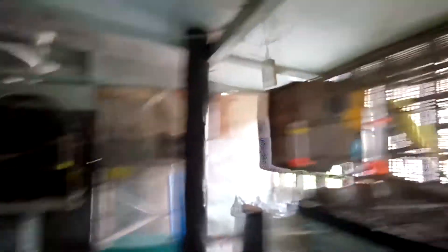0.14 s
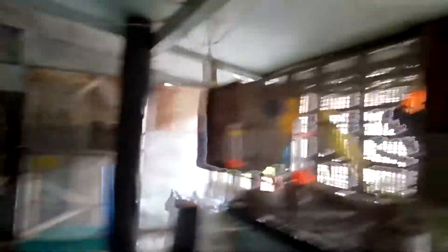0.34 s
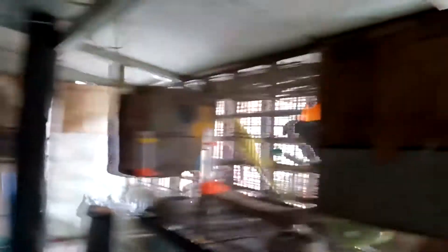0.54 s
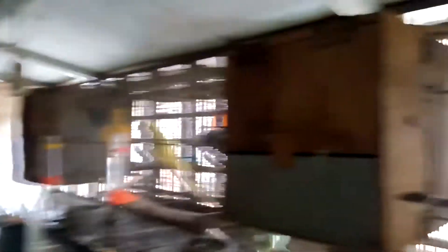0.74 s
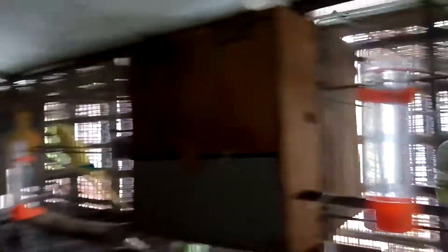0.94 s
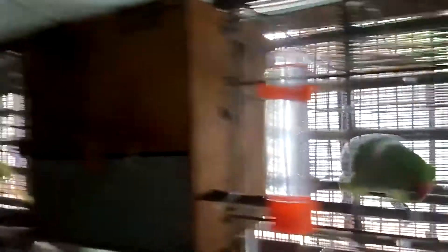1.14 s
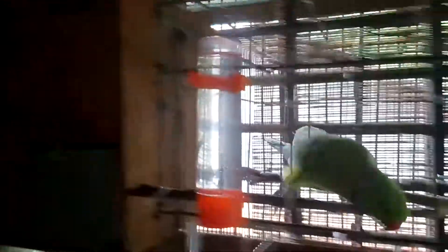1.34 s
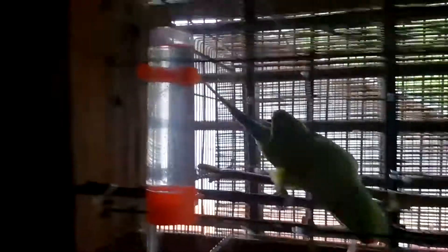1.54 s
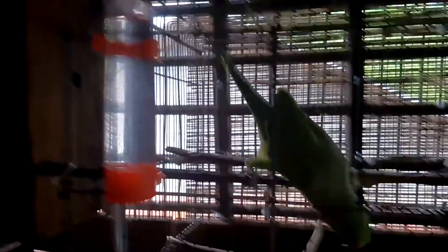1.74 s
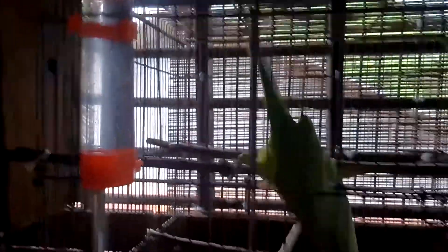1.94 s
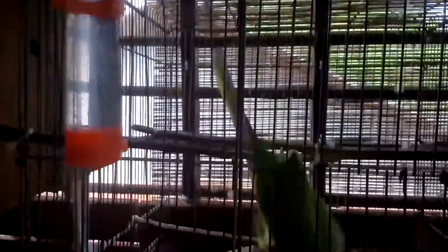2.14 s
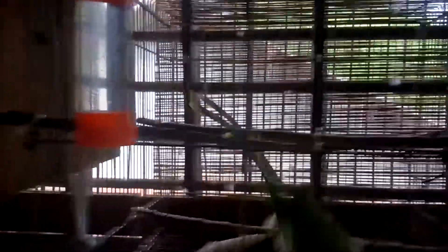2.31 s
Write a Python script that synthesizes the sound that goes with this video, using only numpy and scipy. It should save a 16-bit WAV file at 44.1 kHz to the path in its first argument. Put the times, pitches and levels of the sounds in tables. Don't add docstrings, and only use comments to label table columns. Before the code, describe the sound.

A parakeet squawks harshly twice, close and loud, breaking between whistle and rasp; another bird answers with a nasal note stepping up. Then quiet aviary air, far clucks, faint peeps and claw ticks, on a handheld stereo microphone.

```python
import sys
import numpy as np
from scipy import signal
from scipy.fft import rfft, irfft
from scipy.io import wavfile
from scipy.ndimage import uniform_filter1d

SR = 44100
rng = np.random.default_rng(int(sys.argv[2]) if len(sys.argv) > 2 else 0)


def wav_record(signal):
    frames = np.transpose(np.atleast_2d(signal))
    bounded = np.clip(frames, -1, 1)
    quanta = np.round(bounded * 32767).astype(np.int16)
    wavfile.write(sys.argv[1], SR, quanta)


def ratio_of_db(decibels):
    return 10 ** (np.asarray(decibels, float) / 20)


N = 104649


def unit_power(x):
    return x / np.sqrt(np.mean(np.abs(x) ** 2) + 1e-20)


def read_spectrum(points, hz):
    point_hz, point_db = np.transpose(points)
    return np.interp(np.log(hz), np.log(point_hz), point_db)


def slow_drift(rate_hz, size):
    r = np.exp(-2 * np.pi * rate_hz / SR)
    drift = signal.lfilter([1], [1, -2 * r, r * r], rng.standard_normal(size + 4000))
    return unit_power(drift[4000:])


def filtered(x, order, hz, kind="low"):
    return signal.sosfilt(signal.butter(order, hz, kind, fs=SR, output="sos"), x)


def coloured_noise(points, size):
    hz = np.maximum(np.fft.rfftfreq(size, 1 / SR), 1)
    below = (points[0][0] / 2, points[0][1] - 20)
    above = (SR / 2, points[-1][1] - 20)
    gain = ratio_of_db(read_spectrum([below] + list(points) + [above], hz))
    return unit_power(irfft(rfft(rng.standard_normal(size)) * gain, size))


def pan(left_db):
    return ratio_of_db(left_db * np.array([[.5], [-.5]]))


# pitch_hz, level_db
THROAT = [(900, -46), (1300, -12.5), (2100, -20.5), (3600, 0.5), (4800, -7.5), (6600, -5), (8500, -19),
          (11000, -24.5), (15000, -29.5)]


def note(rows, tones=None, half_db=0, breath_db=-40, follow=0, tear=1):
    wobble_hz, wobble_share = 59, 0.0043
    flutter_hz, flutter_db = 45, 2.5
    tear_share, blur_hz, edge_s = 0.077, 5400, 0.0053
    size = 16384
    s, *columns = np.transpose(rows)
    a, b = max(int(s[0] * SR), 0), min(int(s[-1] * SR), N)
    t = np.arange(a, b) / SR
    hz, db, rough = [np.interp(t, s, c) for c in columns]
    wobble = 1 + wobble_share * slow_drift(wobble_hz, size)[:b - a]
    phase = 2 * np.pi * np.cumsum(hz * wobble) / SR
    flutters = rows[1][3] > .04
    wave, power = 0, 0
    for k, tone_db in tones or [(k, None) for k in range(1, 17)]:
        if tone_db is None:
            heard_hz = k * hz * (hz[0] / hz) ** follow
            gain = ratio_of_db(read_spectrum(THROAT, heard_hz) + half_db * (k % 2))
        else:
            gain = ratio_of_db(tone_db)
        gain = gain * (k * hz < 15500)
        gain = gain * ratio_of_db(flutter_db * flutters * slow_drift(flutter_hz, size)[:b - a])
        clear = (1 - np.clip(rough, 0, 1)) ** (.5 + (k * hz / blur_hz) ** 2)
        noise = rng.standard_normal((2, size))
        torn = filtered(noise[0] + 1j * noise[1], 4, tear * tear_share * rows[1][1])
        body = np.sqrt(clear) + np.sqrt(1 - clear) * unit_power(torn)[a - b:]
        wave = wave + gain * np.imag(body * np.exp(1j * (k * phase + k * k)))
        power = power + uniform_filter1d(gain ** 2, size=800) / 2
    breath = filtered(coloured_noise(THROAT, size), 6, hz.min(), "high")
    wave = wave / np.sqrt(power) + ratio_of_db(breath_db) * breath[a - b:]
    edge = np.clip(np.minimum(t - s[0] + (a == 0), s[-1] - t) / edge_s, 0, 1)
    return np.pad(wave * ratio_of_db(db) * edge, (a, N - b))


# start_s, pitch_hz, level_db, roughness (0-1)
RASPS = [
    [(0.0, 1479, -20, 0.77), (.012, 1940, -30, 0), (.045, 2555, -43, 0.7)],
    [(.145, 3100, -36, 0.6), (.16, 2700, -29.5, 0.34), (.175, 2250, -21.5, 0.5), (.19, 2081, -22, 1),
     (.215, 1763, -20.5, 0.26), (.24, 1665, -34.5, .9), (.3, 1700, -37.5, 1.1)],
    [(.421, 653, -25, 0.3), (.445, 630, -20.5, .75), (.475, 638, -22.5, 0.87), (.497, 818, -25, 0.4),
     (.512, 870, -50, 1.1)],
    [(.503, 2350, -18.5, .6), (.515, 2542, -33, 0.6), (.53, 2570, -26.5, 0.8), (.56, 2460, -46, 0.4)],
]
RASP_BREATH = [4.2, 1.2, 1.1, 4.8]


def rasps():
    total = 0
    for rows, breath_db in zip(RASPS, RASP_BREATH):
        low = rows[0][1] < 900
        total = total + note(rows, half_db=-7 * low, breath_db=breath_db, follow=1. * low)
    return total


# pitch_hz, level_db (per Hz)
PUFF = [(250, -34), (900, -12), (2200, -23.5)]


def puff():
    start_s, level_db, decay_s = .421, -26, 0.014
    t = np.arange(N) / SR - start_s
    return ratio_of_db(level_db) * (t > 0) * np.exp(-np.abs(t) / decay_s) * coloured_noise(PUFF, N)


# multiple (of pitch), level_db
WHISTLE_TONES = [(1, -21), (2, -37.5), (3, -50.5)]
# start_s, pitch_hz, level_db, roughness (0-1)
HIGH_WHISTLE = [(0.028, 5100, -48, 0.4), (0.036, 5110, -13.5, 0), (0.052, 5180, -22, 0.3),
                (.07, 5230, -15.5, 0.16), (.082, 4940, -24.5, 0.34), (0.096, 4730, -24, 0.3),
                (0.112, 4630, -31, 0.4)]
# start_s, pitch_hz, level_db, roughness (0-1)
DROP = [(.066, 4860, -18, .6), (.08, 4500, -29, 0.7), (.092, 3866, -18.5, 0), (.104, 3800, -25, 0.2)]
# start_s, pitch_hz, level_db, roughness (0-1)
CROAK = [(.424, 891, -34, 1), (.445, 1245, -29, 0.7), (.46, 1340, -38, 0.4), (.482, 1420, -51, .6)]
# start_s, pitch_hz, level_db, roughness (0-1)
CLIMB = [(.44, 1750, -28, .9), (.465, 1850, -20, .8), (.49, 2000, -18, .85), (.505, 2250, -18, .9),
         (.52, 2580, -20, .7), (.535, 2600, -28, .7)]
# multiple (of pitch), level_db
CLIMB_TONES = [(1, -16), (2, 3.5), (3, -21), (4, -15)]
# start_s, pitch_hz, level_db, roughness (0-1)
GLIDE = [(.566, 2483, -22, .3), (.58, 2373, -20.5, 0.54), (.601, 2183, -13.5, 0), (.622, 1980, -17, 0.5),
         (.645, 1800, -11.5, 0), (.665, 1628, -18.5, 0.32), (.70, 1571, -32.5, 1)]
# multiple (of pitch), level_db
GLIDE_TONES = [(1, -20), (2, 0.5), (3, -8), (4, -15.5), (5, -21.5)]


def parakeet():
    wide_tear = 2.2
    voice = note(HIGH_WHISTLE, WHISTLE_TONES, breath_db=-23)
    voice += note(DROP, WHISTLE_TONES)
    voice += note(CROAK, [(0.97, 0)], tear=wide_tear)
    voice += note(CLIMB, CLIMB_TONES, breath_db=-15, tear=wide_tear)
    voice += note(GLIDE, GLIDE_TONES, breath_db=-15, tear=1.38)
    return voice + puff() + rasps()


# start_s, pitch_hz, level_db, roughness (0-1)
WHISTLES = [
    [(0.0, 3590, -15, .25), (.018, 3680, -10, .2), (.028, 3760, -11, .2), (.036, 3860, -20, .3),
     (.06, 3800, -25, .4), (.09, 3750, -32, .5)],
    [(.096, 3760, -22, .1), (.105, 3670, -12, .15), (.119, 3610, -16, .1), (.128, 3585, -7, .03),
     (.134, 3570, -8, .03), (.139, 3560, -18, .3), (.16, 3500, -15, .3), (.18, 3450, -26, .3)],
    [(.523, 3420, -28, .05), (.532, 3405, -17, .03), (.55, 3415, -9, .02), (.566, 3390, -10.5, .02),
     (.574, 3300, -20, .05)],
]


def whistles():
    lead = 3
    clear = sum(note(rows, WHISTLE_TONES, breath_db=-23) for rows in WHISTLES)
    return np.array([np.pad(clear[lead:], (0, lead)), clear]) * pan(-5)


# start_s, pitch_hz, level_db, roughness (0-1)
ANSWER_LOW = [(0.772, 1345, -38, 0.15), (.79, 1350, -30, .12), (0.812, 1356, -23, 0.08),
              (0.846, 1325, -23, 0.1), (0.866, 1385, -27, 0.2)]
# multiple (of pitch), level_db
LOW_TONES = [(1, -10), (2, -8.5), (3, -7.5), (4, -5.5), (5, -15.5), (6, -21), (7, -27), (8, -37)]
# start_s, pitch_hz, level_db, roughness (0-1)
ANSWER_HIGH = [(.852, 1343, -27.5, 0.091), (.876, 1433, -19.5, 0.054), (.9, 1433, -20, 0.12),
               (.93, 1416, -19.5, 0.09), (.948, 1413, -16.5, 0.39), (.964, 1360, -23, 0.19),
               (.98, 1331, -21, 1), (1.0, 1367, -45, 0.39)]
# multiple (of pitch), level_db
HIGH_TONES = [(1, -24.5), (2, -6.5), (3, -17.5), (4, -10.5), (5, -25.5), (6, -28.5), (7, -55), (8, -39.5),
              (10, -57)]
# start_s, pitch_hz, level_db, roughness (0-1)
ANSWER_START = [(.738, 1400, -48, .02), (.752, 1390, -39, .02), (.775, 1360, -40, .02),
                (.845, 1335, -39, .03), (.872, 1415, -40, .03), (.95, 1410, -39, .04),
                (.975, 1350, -48, .2)]


def neighbour():
    nasal = note(ANSWER_LOW, LOW_TONES, breath_db=-22) + note(ANSWER_HIGH, HIGH_TONES, breath_db=-22)
    return nasal, note(ANSWER_START, [(0.99, 0)])


# start_s, length_s, level_db, pitch_hz
CLUCKS = [
    (.726, .09, -44, 635),
    (.955, .13, -43, 618),
    (1.205, .12, -44, 615),
    (1.519, .07, -46, 590),
    (1.79, .14, -46, 628),
    (2.08, .05, -47, 585),
]
# multiple (of pitch), level_db
CLUCK_TONES = [(1, 0), (2, -4), (3, -12), (4, -26)]


def fowl():
    rise_s, sag_db, rough = .03, 3, .5
    total = 0
    for start_s, length_s, level_db, pitch_hz in CLUCKS:
        rows = [(start_s, .92 * pitch_hz, level_db - sag_db, rough),
                (start_s + rise_s, pitch_hz, level_db, rough),
                (start_s + length_s, 0.88 * pitch_hz, level_db - 2 * sag_db, rough)]
        total = total + note(rows, CLUCK_TONES)
    return total


# start_s, length_s, pitch_hz, level_db
PEEPS = [
    (1.229, 0.033, 4980, -53.5),
    (1.795, 0.015, 5210, -48.5),
    (2.168, 0.036, 4630, -56),
]


def peeps():
    total = 0
    for start_s, length_s, pitch_hz, level_db in PEEPS:
        rows = [(start_s, pitch_hz, level_db, .6), (start_s + length_s, .97 * pitch_hz, level_db, .6)]
        total = total + note(rows, [(0.99, 0)])
    return total


# start_s, level_db
TICKS = [
    (1.739, -46),
    (1.802, -48),
    (1.975, -50),
    (2.096, -43),
    (2.158, -42),
]


def claws():
    t, decay_s, low_hz = np.arange(N) / SR, .003, 5500
    shape = sum(ratio_of_db(db) * (t > s) * np.exp(-np.abs(t - s) / decay_s) for s, db in TICKS)
    return shape * filtered(rng.standard_normal(N), 2, [low_hz, 1.58 * low_hz], "band")


# start_s, level_db
RUSTLE = [(1.0, -88), (1.6, -81), (1.8, -68), (1.95, -73), (2.1, -66), (2.37, -83)]


def rustle():
    hiss = filtered(rng.standard_normal((2, N)), 2, 8000, "high")
    swell_db = np.interp(np.arange(N) / SR, *np.transpose(RUSTLE))
    return hiss * ratio_of_db(swell_db + 2.0 * slow_drift(15, N))


def spread(points, alike, patchy_db):
    shared = np.sqrt(1 + alike) * coloured_noise(points, N)
    opposed = np.sqrt(1 - alike) * coloured_noise(points, N) * [[1], [-1]]
    pair = (shared + opposed) * ratio_of_db(patchy_db * slow_drift(17, N))
    return unit_power(pair) / np.sqrt((1 + alike) / 2)


# pitch_hz, level_db (per Hz)
YARD = [(290, -24.5), (500, 1), (592, -4), (673, 0), (1410, -3.5), (1710, -4), (2940, -11.5), (5540, -10.5),
        (11000, -45.5), (14300, -74), (22000, -120)]


def yard():
    return ratio_of_db(-47.5) * spread(YARD, alike=0.043, patchy_db=1.44)


# pitch_hz, level_db (per Hz)
FAN = [(15, -50), (25, -20), (48, -18), (124, 2), (174, -9), (418, -17.5), (474, -34.5), (600, -20),
       (700, -29.5), (910, -30), (1540, -120)]


def fan():
    blades_hz, beat_db = 16.8, 2.5
    beat = np.sin(2 * np.pi * blades_hz * np.arange(N) / SR)
    return ratio_of_db(-38.5 + beat_db * beat) * spread(FAN, alike=0.9, patchy_db=0.0)


def aviary(x, late_db=0):
    room_db, early_db = -7, 6
    early_t60_s, late_t60_s, gap_s = .05, .3, 0.0027
    t = np.arange(SR // 2) / SR
    tail = filtered(rng.standard_normal((2, len(t))), 1, [1900, 8340], "band")
    late = ratio_of_db(-60 * t / late_t60_s) * (t > gap_s)
    tail = tail / np.sqrt(np.mean(np.sum((tail * late) ** 2, axis=1)))
    tail = tail * late * (ratio_of_db(late_db) + ratio_of_db(early_db - 60 * t / early_t60_s))
    return ratio_of_db(room_db) * signal.fftconvolve(x[None], tail, axes=1)[:, :N]


def ducking(cry):
    from_db, slope, back_db_per_s = -32, 1.2, 270
    level_db = 10 * np.log10(uniform_filter1d(cry ** 2, size=900) + 1e-9)
    creep = back_db_per_s * np.arange(N) / SR
    held_db = np.maximum.accumulate(np.maximum(level_db - from_db, 0) + creep) - creep
    return ratio_of_db(-slope * uniform_filter1d(held_db, size=900))


def scene():
    pure, near = whistles(), parakeet()
    nasal, root = neighbour()
    cries = near * pan(-4) + nasal * pan(1.5) + root * pan(14.5) + pure
    cries += aviary(near) + aviary(nasal + pure.mean(axis=0), late_db=-8)
    high_pass = signal.butter(4, 6500, "high", fs=SR, output="sos")
    cries[1] -= signal.sosfiltfilt(high_pass, cries[1]) * (1 - ratio_of_db(-13))
    duck = ducking(near + pure[1])
    far = fowl()
    background = yard() + ratio_of_db(3) * (far + aviary(far)) + claws() + peeps() + rustle()
    mix = cries + duck * background
    left_lag = 18
    mix[0] = np.pad(mix[0], (left_lag, 0))[:N]
    return mix + duck ** .65 * fan()


def roll_off(x):
    return signal.sosfilt(signal.butter(12, 15690, fs=SR, output="sos"), x)


def record(dry):
    hz = np.fft.rfftfreq(N + SR, 1 / SR)
    peak = 2.5 * np.exp(-((hz - 15000) / 1000) ** 2)
    dip = .6 * np.exp(-((hz - 12800) / 1300) ** 2)
    hissing = dry + ratio_of_db(-90) * rng.standard_normal(dry.shape)
    mix = irfft(rfft(hissing, N + SR, axis=1) * (1 + peak - dip), N + SR, axis=1)[:, :N]
    return roll_off(mix)


dry = scene()
out = record(dry)
wav_record(out)
```